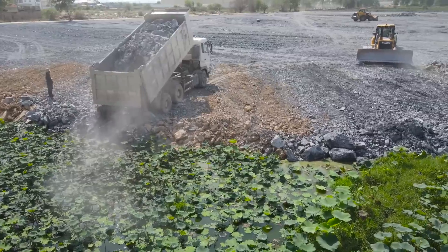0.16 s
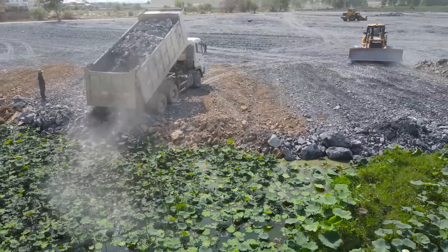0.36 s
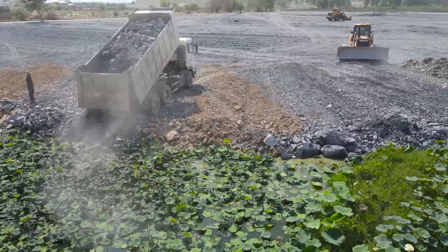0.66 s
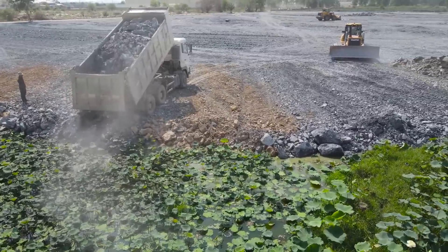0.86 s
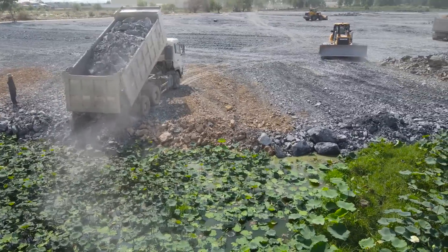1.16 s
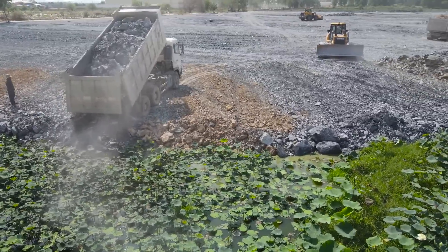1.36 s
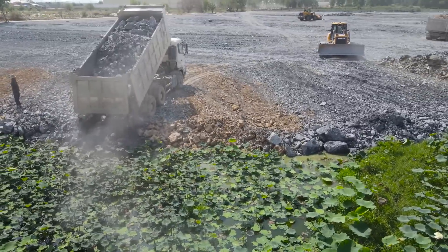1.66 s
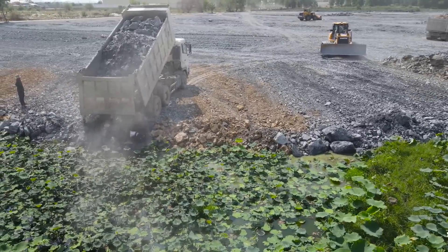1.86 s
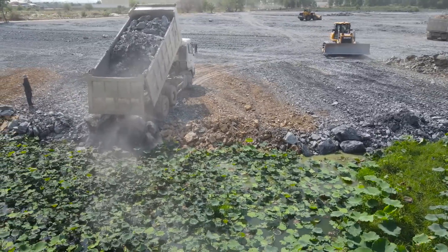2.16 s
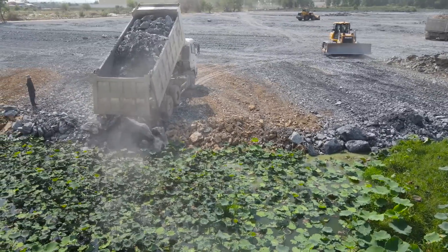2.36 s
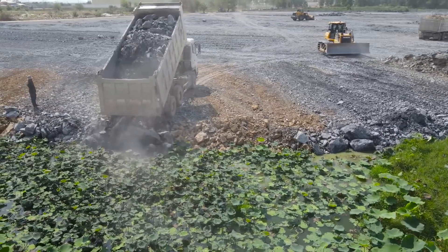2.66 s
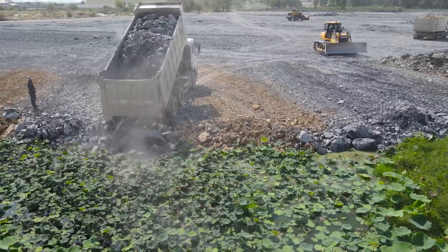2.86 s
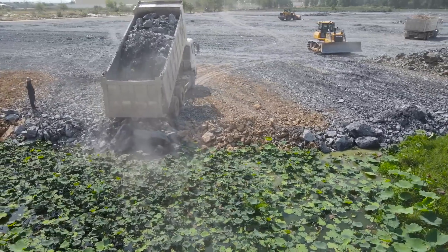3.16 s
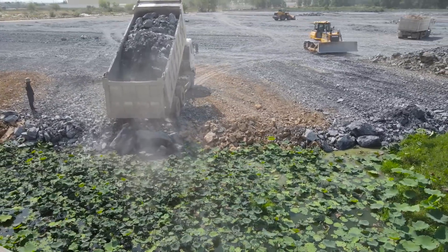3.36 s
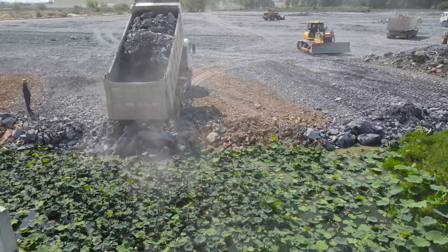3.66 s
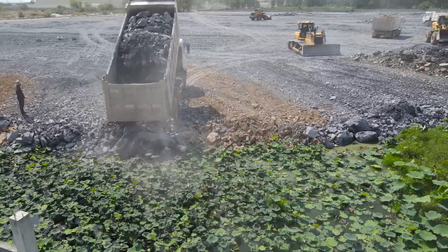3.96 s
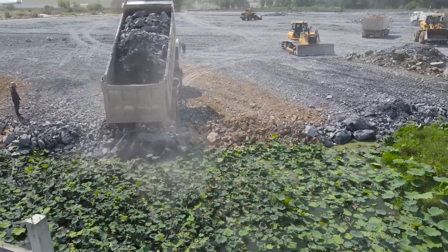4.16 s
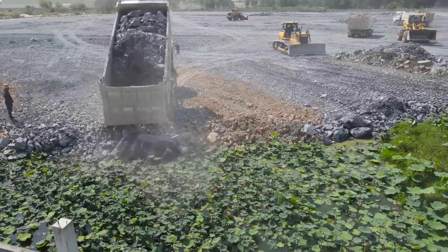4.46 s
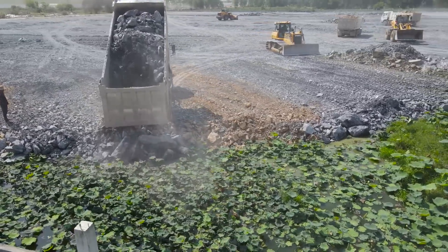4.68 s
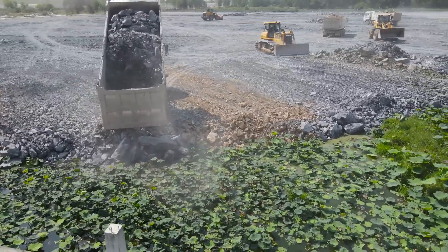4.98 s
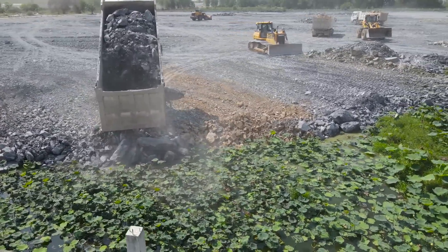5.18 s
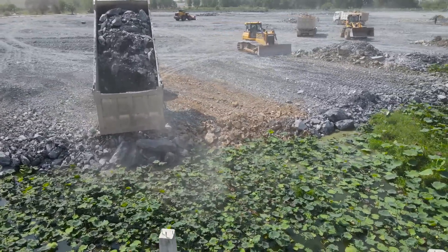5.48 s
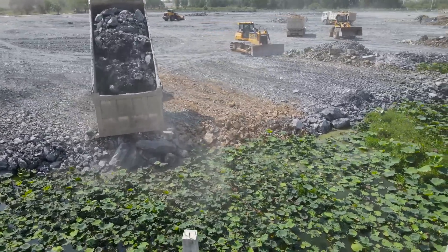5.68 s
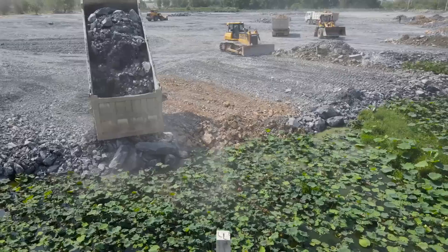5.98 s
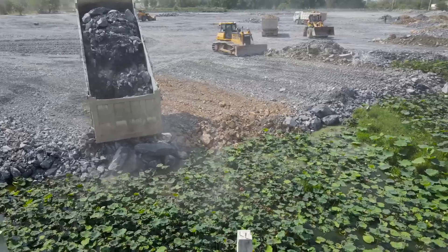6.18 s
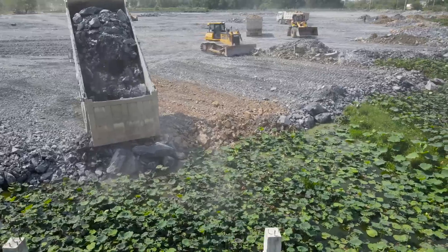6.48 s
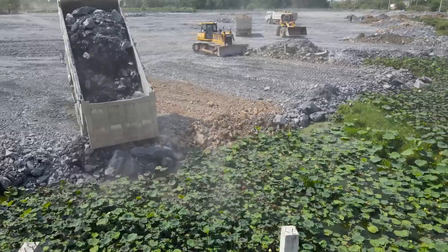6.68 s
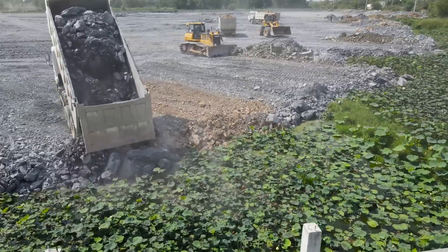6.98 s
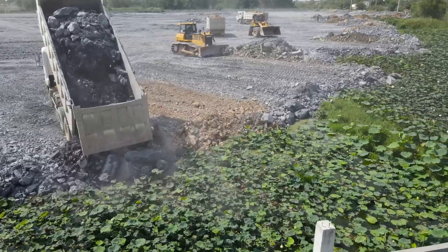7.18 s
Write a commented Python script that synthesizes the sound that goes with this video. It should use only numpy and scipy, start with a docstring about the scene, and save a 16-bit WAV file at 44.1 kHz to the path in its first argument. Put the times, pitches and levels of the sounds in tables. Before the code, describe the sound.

The sound starts mid-pour: in the first half second boulders thud and crack rapidly on a resonant steel truck bed, with sharp clinks, dense clatter and hissing grit. Under it runs the truck's low, slightly wavering diesel note and exhaust rumble. From 0.7 to 2.3 seconds blows are more spaced, with a short slide near 1.9, and a faint high whistle sinks until about 3.3. A bulldozer's diesel drone swells from 2 to 2.5 seconds and stays. A distant machine revs at 3.0, as rocks cluster and slide until 3.5. A pump hum and whine rise around 3.8; the whine stops near 5, the hum near 6. Faint rough gear whine sounds from 3.8 to 5.2. Another slide comes at 5.4 and a second rev from 5.95 to 6.8. The truck note fades after 5.7, but knocks bunch again around 7. Open air, close stereo microphone ports, short scattered echoes.

```python
"""Quarry rock tipped down a stony bank

In the open, a tipper truck pours rock while a bulldozer works behind it and a distant machine revs twice.
The engines, pump, gears and turbocharger are wavering tones; exhaust rumble, clatter and hiss are shaped noise.
Boulders thud and crack from the steel bed, singly or in short slides, as bursts of contacts with ringing modes.
Cobbles and gravel tumble at random between them, and the bank and the bed scatter echoes of every blow."""
import sys
import numpy as np
from scipy import signal
from scipy.fft import rfft, irfft, next_fast_len
from scipy.io import wavfile
from scipy.ndimage import map_coordinates

SR = 44100
rng = np.random.default_rng(int(sys.argv[2]) if len(sys.argv) > 2 else 0)


def wav_out(sig):
    """Save sig, one row per channel (or a flat mono array), as 16-bit PCM at SR to the path in sys.argv[1]."""
    wavfile.write(sys.argv[1], SR, np.round(np.clip(np.atleast_2d(sig).T, -1, 1) * 32767).astype(np.int16))


N = 323253
TIME = np.arange(N) / SR

# the truck's engine note: time_s, firing_rate_hz, level_db
TRUCK_NOTE = [(0, 71.1, -24), (.5, 70.44, -26), (2.5, 70, -25.5), (2.9, 72.1, -25.5), (3.8, 71.45, -28.5),
              (5.7, 73.12, -32), (6.45, 74.3, -40), (6.8, 68.3, -46)]
# spectrum of a boulder's blow: frequency_hz, relative_level_db
BOULDER_COLOUR = [(40, -7), (90, 6.5), (200, 1.5), (350, 2), (520, 5.5), (820, 4), (1050, 0), (1300, -1),
                  (1900, -4.5), (2400, -13), (4000, -19), (10500, -27.5), (11800, -57)]
# spectrum of stone on stone: frequency_hz, relative_level_db
STONE_COLOUR = [(300, -6), (900, -8.5), (1800, -5), (2600, 3.5), (3200, 8.5), (4400, 1), (5400, 1),
                (6800, -8.5), (8500, -0.5), (10500, 0), (11800, -30)]
# resonances of the steel bed, heard under every blow: frequency_hz, width_hz, boost_db
BED_MODES = [(355, 50, 2.5), (515, 45, 5), (680, 70, 3), (840, 60, 2.5), (1290, 130, 3), (1680, 110, 3),
             (3050, 200, 2), (5440, 220, 5)]
# time constant of first contact before a blow or a ring sounds fully
CONTACT_S = .0016


def amp(db):
    """Decibels to gain."""
    return 10 ** (np.asarray(db) / 20)


def unit(x):
    """Scales to an rms of one."""
    return x / np.sqrt(np.mean(x ** 2) + 1e-20)


def follow(rows):
    """The columns of a curve at every sample."""
    s, *columns = np.transpose(rows)
    return [np.interp(TIME, s, column) for column in columns]


def read(points, hz):
    """Reads a frequency table on a log-frequency axis."""
    f, value = np.transpose(points)
    return np.interp(np.log(hz + 1), np.log(f + 1), value)


def bins(x):
    """The frequencies of a signal's spectrum."""
    return np.fft.rfftfreq(x.shape[-1], 1 / SR)


def colour(x, db):
    """Filters by a dB value for each frequency; rms one."""
    return unit(irfft(rfft(x) * amp(db), x.shape[-1]))


def shaped(x, spectrum):
    """Gives a long sound the colour of a spectrum table."""
    padded = np.pad(x, ((0, 0), (0, next_fast_len(N, True) - N)))
    return colour(padded, read(spectrum, bins(padded)))[:, :N]


def wander(per_s):
    """Smooth random curve of rms one, with per_s random knots a second."""
    knots = rng.standard_normal(4096)
    coarse = TIME[::32]
    curve = map_coordinates(knots, [coarse * per_s], order=2, mode="wrap")
    return unit(np.interp(TIME, coarse, curve))


def spell(start, end, fade_s):
    """A level in dB: zero from start to end, falling 20 dB in every fade_s outside them."""
    outside_s = np.maximum(np.maximum(start - TIME, TIME - end), 0)
    return -20 * outside_s / fade_s


def add(mix, s, sound):
    """Adds a sound into the mix at time s."""
    part = mix[:, max(round(s * SR), 0):][:, :sound.shape[1]]
    part += sound[:, :part.shape[1]]


def tones(hz, level_db, orders, waver, flutter_db):
    """Multiples of a slightly unsteady speed, each fluttering in the outdoor air."""
    turns = np.cumsum(hz * (1 + waver * wander(14))) / SR
    lines = 0
    for multiple, db in orders:
        level = amp(db + flutter_db * wander(9.8))
        lines = lines + level * np.cos(2 * np.pi * (multiple * turns + rng.random()))
    return np.sqrt(2) * amp(level_db) * lines


def rev(start, length, hz, db):
    """A far machine drones up, lifts in pitch for a moment, sags in level and dies away."""
    sag_db, lift_hz = 5, 9
    lift_at, lift_width = .62, .2  # shares of the length
    progress = np.clip((TIME - start) / length, 0, 1)
    lift = np.exp(-((progress - lift_at) / lift_width) ** 2)
    level_db = db - sag_db * progress + spell(start, start + length, fade_s=.14)
    return tones(hz + lift_hz * lift, level_db, [(1, 0)], waver=.002, flutter_db=.9)


def bulldozer():
    """A steady diesel note that grows louder as it starts to push, and the rough whine of gears."""
    # exhaust lines: multiple_of_firing_rate, relative_level_db
    dozer_orders = [(.9, -10), (0.999, -3.5), (2, -13.5), (3, -13), (3.602, -13.5)]
    # gear whine in the machines behind: time_s, pitch_hz, level_db
    gear_whine = [(3.6, 1030, -70), (3.84, 1028, -39.5), (4.05, 1058, -38), (4.25, 1036, -40),
                  (4.66, 1036, -41), (4.78, 1056, -38), (5.18, 1056, -40), (5.4, 1060, -70)]
    firing_hz, light_db, push_db, push_start_s = 88.5, -44.5, -30, 2.47
    level_db = np.maximum(light_db, push_db + spell(push_start_s, TIME[-1], fade_s=.5))
    exhaust = tones(firing_hz, level_db, dozer_orders, waver=0.0036, flutter_db=1.4)
    roughness = unit(amp(wander(50)))
    return exhaust + tones(*follow(gear_whine), [(1, 0)], waver=.003, flutter_db=1.5) * roughness


def turbo():
    """A thin, faint whistle that sinks as the turbocharger runs down, hunting a little."""
    # time_s, pitch_hz, level_db
    whistle = [(.28, 9430, -54), (.6, 9200, -62), (1.25, 9090, -57), (2.05, 8910, -55), (2.55, 8930, -57),
               (2.73, 9000, -53), (3.3, 8650, -72)]
    return tones(*follow(whistle), [(1, 0)], waver=.001, flutter_db=2)


def truck():
    """The truck's exhaust note, and the hydraulic pump that turns with the engine to lift the bed."""
    # exhaust lines: multiple_of_firing_rate, relative_level_db
    truck_orders = [(1, -1.5), (1.5, -19.5), (2, -20), (2.5, -37), (3, -14.5)]
    # pump hum lines: multiple_of_firing_rate, relative_level_db
    pump_orders = [(2, -2), (3, 1)]
    # the pump hums through the lift and whines for its first part
    lift_start_s, whine_end_s, lift_end_s = 3.8, 4.96, 6.1
    hum_db = -41.5 + spell(lift_start_s, lift_end_s, fade_s=0.58)
    whine_db = -37.5 + spell(lift_start_s, whine_end_s, fade_s=.35)
    hz, level_db = follow(TRUCK_NOTE)
    exhaust = tones(hz, level_db, truck_orders, waver=0.0029, flutter_db=0.16)
    hum = tones(hz, hum_db, pump_orders, waver=0.0013, flutter_db=2.5)
    whine = tones(hz, whine_db, [(12, 0)], waver=.002, flutter_db=1.5)
    roughness = unit(amp(1.2 * wander(50)))
    return exhaust + hum + whine * roughness


def engines():
    """All the machines' notes together."""
    # a distant machine revs: start_s, length_s, pitch_hz, level_db
    rev_rows = [(2.97, .53, 236, -30.5), (5.95, .82, 240, -30)]
    return sum(rev(*row) for row in rev_rows) + bulldozer() + turbo() + truck()


def pouring():
    """Levels in dB of the clatter and of the hiss, both driven by the pour."""
    # how strongly the load pours from the bed: time_s, relative_level_db
    pour = [(0, 0.5), (.5, 0), (1.5, -3), (3.4, -3), (5, -5.5), (5.7, -4), (6.6, -7), (7.1, -6.5)]
    # the clatter follows the pour only in part (dB per dB)
    clatter_db, hiss_db, clatter_follows = -25.5, -34.5, 0.86
    pour_db, = follow(pour)
    return clatter_db + clatter_follows * pour_db, hiss_db + pour_db


def grit(size, spread_db):
    """Tiny contacts of widely varying strength, each lasting 16 samples, a third of a millisecond."""
    strength = np.repeat(rng.standard_normal(size // 16 + 1), 16)[:size]
    return rng.standard_normal((2, size)) * amp(spread_db * np.minimum(strength, 2.5))


def din():
    """Exhaust rumble, the dense clatter of tracks and stone, and the hiss of sliding grit."""
    # spectra of the three: frequency_hz, relative_level_db
    rumble_colour = [(20, -27), (35, -13), (50, -5), (70, 6), (110, 1.5), (160, -5), (220, 1), (300, -12.5),
                     (500, -50)]
    clatter_colour = [(120, -18), (240, -2), (350, 2), (520, 2.5), (780, -2), (1050, -2.5), (1450, -6.5),
                      (1700, -3.5), (2150, -9.5), (2400, -9), (2700, -15), (3050, -21.5), (4500, -49)]
    hiss_colour = [(1500, 6), (3000, 4.5), (5500, -0.5), (7000, -2.5), (8200, -1), (9000, 4), (10600, -2.5),
                   (11200, -4), (11800, -17)]
    # the rumble follows the truck's note only in part (dB per dB) about its usual level
    rumble_db, usual_truck_db, rumble_follows = -29.5, -26.5, 0.31
    _, truck_db = follow(TRUCK_NOTE)
    clatter_db, hiss_db = pouring()
    exhaust, sand = rng.standard_normal((2, 2, N))
    rumble_level = amp(rumble_db + rumble_follows * (truck_db - usual_truck_db))
    rumble = shaped(exhaust, rumble_colour) * rumble_level
    clatter = shaped(grit(N, spread_db=1.0), clatter_colour) * amp(clatter_db + 1.27 * wander(60))
    hiss = shaped(sand, hiss_colour) * amp(hiss_db + 1.2 * wander(40))
    return rumble + clatter + hiss


def blow(spectrum, decay, rise, spread_db, own_db, tilt_db=0):
    """A rock's cluster of contacts, coloured by its own shape and by the ringing bed."""
    contacts = grit(5000, spread_db)
    hz = bins(contacts)
    t = np.arange(contacts.shape[1]) / SR
    octaves = np.log2((hz + 1) / 800)
    own = np.interp(octaves, np.linspace(-4, 4, 64), rng.standard_normal(64))
    bed_db = sum(db / (1 + (2 * (hz - f) / width) ** 2) for f, width, db in BED_MODES)
    treble_db = tilt_db * np.clip(octaves, -1, 1.5)
    sound = colour(contacts, read(spectrum, hz) + bed_db + own_db * np.tanh(own) + treble_db)
    # the rock crunches for a moment, then comes to rest
    swell = (1 - np.exp(-t / rise)) * np.exp(-(t / decay) ** 1.8)
    swell /= swell.max()
    return unit(sound * swell) * np.sqrt(np.mean(swell ** 2))


def ring(hz, t60):
    """One struck mode dying away by 60 dB in t60 seconds, its phase different in the two channels."""
    t = np.arange(5000) / SR
    envelope = (1 - np.exp(-t / CONTACT_S)) * amp(-60 * t / t60)
    return envelope * np.sin(2 * np.pi * (hz * t + rng.random((2, 1))))


def tumble(spectrum, level_db, count, decay, own_db):
    """Smaller stones roll down at random moments, their strength scattered about the level curve."""
    out = np.zeros((2, N))
    for at in rng.integers(0, N, count):
        gain = amp(level_db[at] + rng.uniform(-3.6, 2))
        stone = blow(spectrum, decay, rise=0.00024, spread_db=8.0, own_db=own_db)
        add(out, at / SR, gain * stone)
    return out


def rubble():
    """Cobbles knock and gravel ticks between the big blows, as strong as the pour."""
    clatter_db, hiss_db = pouring()
    cobbles = tumble(BOULDER_COLOUR, clatter_db - 2, count=130, decay=.02, own_db=4.5)
    gravel = tumble(STONE_COLOUR, hiss_db - 4, count=110, decay=.014, own_db=5)
    return cobbles + gravel


def clink(hz):
    """A hard edge snaps against steel or stone and rings for an instant."""
    # spectrum of the snap: frequency_hz, relative_level_db
    snap_colour = [(1200, -24), (2500, -11.5), (5400, -7), (7000, -13.5), (11000, -32)]
    snap = blow(snap_colour, decay=.008, rise=.0008, spread_db=3, own_db=2.5)
    return snap + amp(6) * ring(hz, t60=.026)


def landing(thud_db, treble_db, crack_db, panel_hz):
    """One rock: the thud of its weight, two modes of the struck panel, a stony crack and a short roll."""
    panel_gain_db, panel_t60_s = 2, .06
    thud = blow(BOULDER_COLOUR, decay=.017, rise=CONTACT_S, spread_db=2.5, own_db=3, tilt_db=treble_db)
    overtone = amp(treble_db - 5) * ring(panel_hz * rng.uniform(1.3, 2.2), panel_t60_s)
    panel = amp(panel_gain_db) * (ring(panel_hz, panel_t60_s) + overtone)
    # the rock rolls on after its blow
    roll = blow(BOULDER_COLOUR, decay=.048, rise=.03, spread_db=4.0, own_db=3.5, tilt_db=treble_db)
    roll *= amp(ROLL_DB)
    crack = blow(STONE_COLOUR, decay=.019, rise=CONTACT_S, spread_db=3.0, own_db=3.0)
    return amp(thud_db) * (thud + panel + roll) + amp(crack_db) * crack


def slides():
    """Part of the load gives way: rocks land at uneven intervals on the bed's large panels."""
    # start_s, length_s, thud_db, crack_db (both before the slides' overall gain)
    slide_rows = [(0.369, .17, -27, -24), (1.86, .21, -17.5, -23), (3.31, .24, -16, -27),
                  (5.393, .14, -15, -24)]
    count, gain_db, treble_db, spread_db = 8, -10.5, 0.5, 3.5
    panels_hz = [hz for hz, width, db in BED_MODES[:4]]
    out = np.zeros((2, N))
    for start, length, thud_db, crack_db in slide_rows:
        for k, (late, size) in enumerate(rng.random((count, 2))):
            gain = amp(gain_db + spread_db * (2 * size - 1.5))
            rock = landing(thud_db, treble_db, crack_db, rng.choice(panels_hz))
            add(out, start + length * (k + late) / count, gain * rock)
    return out


def rocks():
    """Single boulders land, each ringing the panel that it strikes, and stony edges clink."""
    # time_s, thud_db, treble_tilt_db (per octave), crack_db, panel_hz; levels before the overall gain
    rock_rows = [(.06, -13.5, -3.5, -25, 534), (0.106, -17.5, 0, -34, 550), (0.125, -17, -1, -32, 507),
                 (.18, -16, -11, -32, 352), (.193, -22, -21, -39, 340), (0.258, -28, -1, -38, 630),
                 (.289, -17.5, -6, -47, 766), (.326, -28, -14, -36, 340), (.358, -15.5, 0, -24, 546),
                 (.405, -24.5, -3, -26, 680), (.427, -15.5, -2.5, -31, 700), (.446, -26, 10, -27, 685),
                 (.473, -18, -9, -27, 364), (.515, -22, 0, -39, 640), (.693, -21, -2, -42, 724),
                 (.851, -18, 1.5, -27, 517), (1.173, -17.5, 0, -44, 510), (1.226, -19, -4, -25.5, 494),
                 (1.787, -18.5, 1, -26.5, 363), (1.907, -14, 0, -34, 755), (1.969, -26, -1, -23, 700),
                 (2.366, -16.5, 1.5, -19, 594), (2.415, -24.5, -6, -34, 850), (2.709, -13, -2, -21.5, 497),
                 (2.741, -17, -4, -26, 760), (2.908, -24, 2, -44, 1840), (2.996, -17, -1.5, -25, 900),
                 (3.074, -19.5, 2.5, -32, 1250), (3.225, -17, 1, -28, 600), (3.274, -16.5, 1, -40, 493),
                 (3.291, -14.5, -2, -20.5, 362), (3.449, -16, -2.5, -26, 520), (3.764, -18.5, -3, -38, 540),
                 (4.031, -14.5, 2, -39, 720), (4.055, -30, -4, -32, 880), (4.098, -14.5, -1, -30, 670),
                 (4.115, -24, -6, -24.5, 970), (4.138, -16.5, 3.5, -28, 830),
                 (4.178, -21.5, -4, -29.5, 890), (4.523, -19.5, -2, -32, 346), (4.692, -15, -3.5, -28, 533),
                 (4.938, -24, -8, -42, 910), (5.158, -22.5, -3.5, -47, 910), (5.547, -19, -7, -30, 520),
                 (5.708, -20.5, -1, -38, 1185), (5.86, -17, 2.5, -35, 515), (5.935, -17, -3, -44, 507),
                 (6.135, -21, 1, -35, 870), (6.381, -17, -1.5, -28, 750), (6.802, -16, -1, -37, 880),
                 (6.828, -19.5, -3, -38, 560), (6.886, -18, -2, -31, 535), (6.961, -20, -1, -42, 700),
                 (6.98, -19, 3, -42, 834), (7.008, -20.5, 3, -28, 684), (7.028, -19, -0.5, -25.5, 684),
                 (7.063, -17.5, 0, -28, 830), (7.083, -23, -7, -37, 640), (7.281, -18, 0.5, -25, 550)]
    # an edge meets the steel or another stone: time_s, gain_db, pitch_hz
    clink_rows = [(.003, -27, 2640), (.184, -26, 5440), (.256, -37, 2950), (.742, -37, 3000),
                  (1.969, -35, 2980), (2.366, -30, 5590), (2.387, -32, 3140), (2.667, -38, 5300),
                  (2.71, -37, 2970), (3.291, -33, 2500), (3.449, -36, 3010), (5.551, -33, 5200),
                  (5.885, -30, 5560)]
    gain_db = -6.6
    out = np.zeros((2, N))
    for s, *rock in rock_rows:
        add(out, s - CONTACT_S, amp(gain_db) * landing(*rock))
    for s, db, hz in clink_rows:
        add(out, s, amp(db) * clink(hz))
    return out


def bank(x):
    """Scattered echoes from the truck's bed and the stony bank: sparse random taps that die away."""
    echo_db, t60_s, first_echo_s, echoes_per_s = -11.5, .55, .006, 1500
    t = np.arange(SR // 2) / SR
    present = (rng.random((2, len(t))) < echoes_per_s / SR) * (t > first_echo_s)
    taps = rng.standard_normal((2, len(t))) * present * amp(-60 * t / t60_s)
    taps /= np.linalg.norm(taps[0])
    return x + amp(echo_db) * signal.fftconvolve(x, taps, axes=1)[:, :N]


def scene():
    """Sound reaches two closely spaced microphone ports: one part that both ports hear alike, and one part that
    differs between them."""
    # how alike the ports hear the sound when its common and differing parts are equally strong: frequency_hz,
    # likeness (0 to 1)
    port_likeness = [(130, 0.87), (330, 0.97), (750, 0.94), (1250, 0.89), (1900, 0.67), (2900, 0.41),
                     (3900, 0.72), (5000, 0.84), (6300, 0.82), (8500, 1)]
    # frequency_hz, left_lead_rad
    left_lead = [(900, 0), (3400, .3), (8800, -.1), (9350, -1.6), (9900, -3), (10450, -3.4), (11000, -5.7),
                 (11400, -6.2)]
    size = next_fast_len(N, True)
    common, differing = din() + bank(rocks() + slides() + rubble())
    common = rfft(common + engines(), size)
    differing = rfft(differing, size)
    hz = np.fft.rfftfreq(size, 1 / SR)
    same = np.clip(read(port_likeness, hz), 0, 1)
    common = common * np.sqrt((1 + same) / 2)
    differing = differing * np.sqrt((1 - same) / 2)
    # near 10 kHz the two ports swing against each other, so the sound there lies mostly in their difference;
    # each takes half the lead
    half_lead = np.exp(.5j * read(left_lead, hz))
    left = (common + differing) * half_lead
    right = (common - differing) / half_lead
    return irfft(np.array([left, right]), size)[:, :N]


def record(dry):
    """The recorder rounds off the highest peaks, then limits the band."""
    ceiling, edge_hz = .55, 11800
    rounded = dry / (1 + (dry / ceiling) ** 4) ** (1 / 4)
    lowpass = signal.firwin(511, edge_hz, window=("kaiser", 9), fs=SR)
    return signal.oaconvolve(rounded, lowpass[None], "same")


# level of a rock's roll against its thud
ROLL_DB = 0


dry = scene()
out = record(dry)
wav_out(out)
```